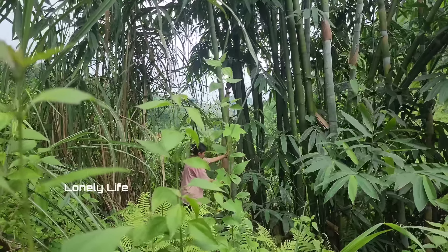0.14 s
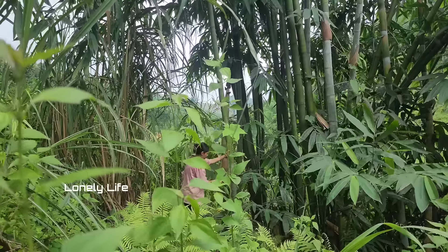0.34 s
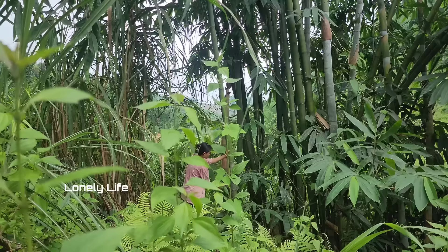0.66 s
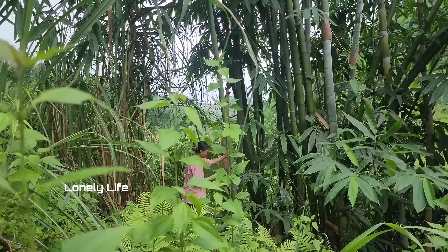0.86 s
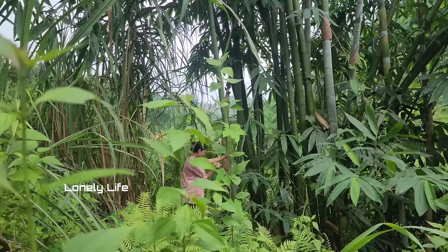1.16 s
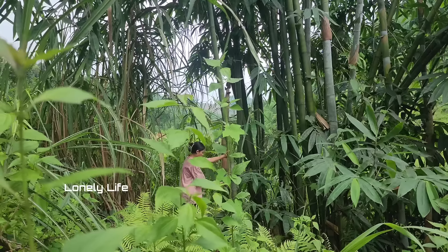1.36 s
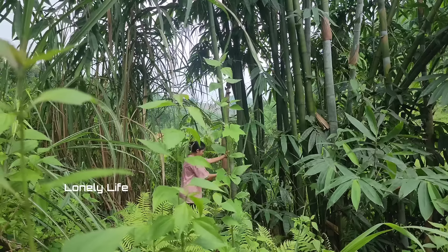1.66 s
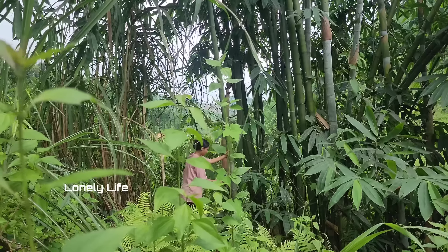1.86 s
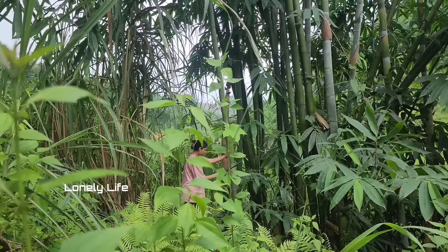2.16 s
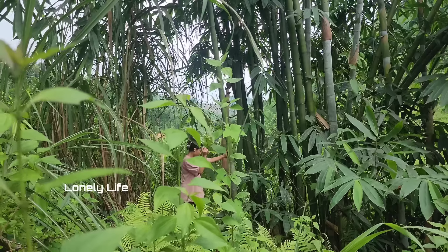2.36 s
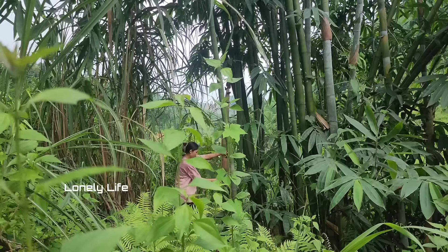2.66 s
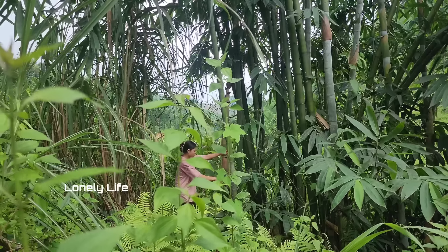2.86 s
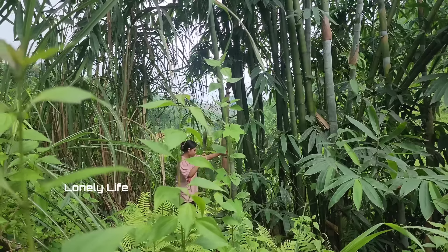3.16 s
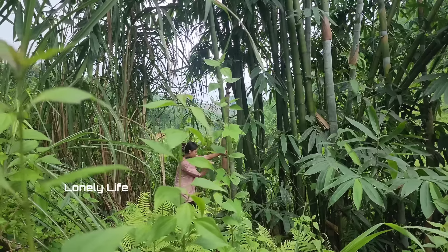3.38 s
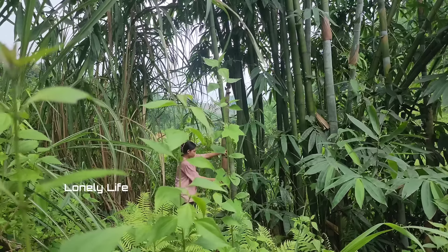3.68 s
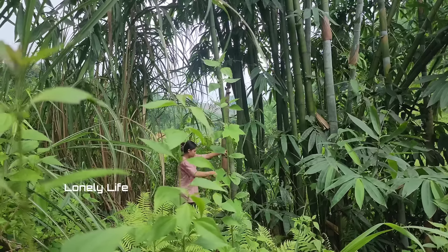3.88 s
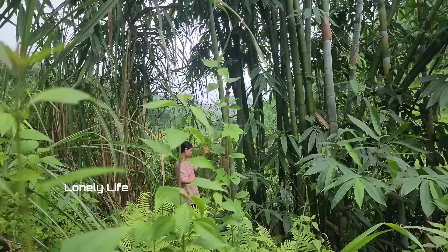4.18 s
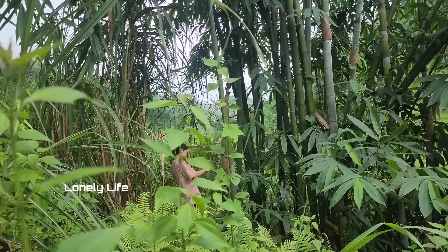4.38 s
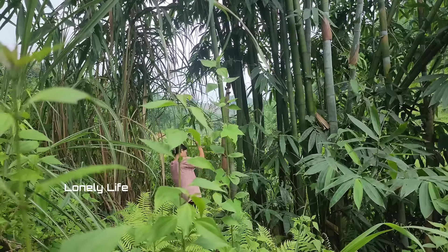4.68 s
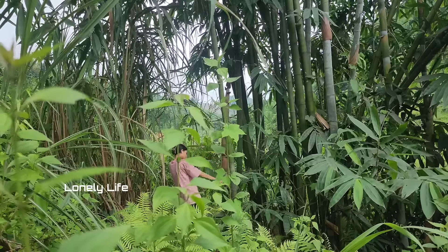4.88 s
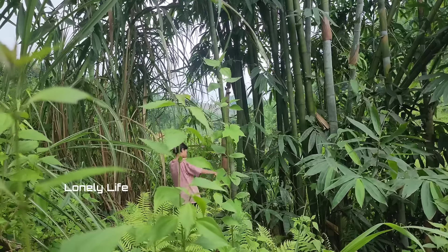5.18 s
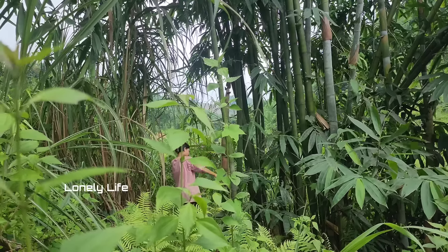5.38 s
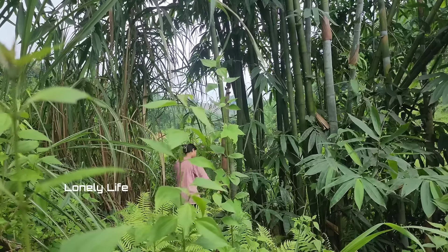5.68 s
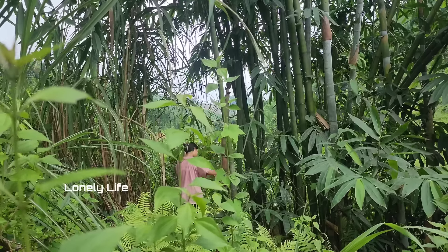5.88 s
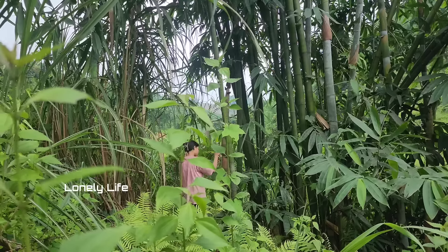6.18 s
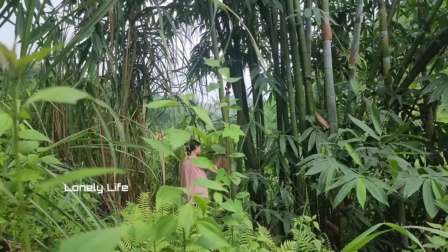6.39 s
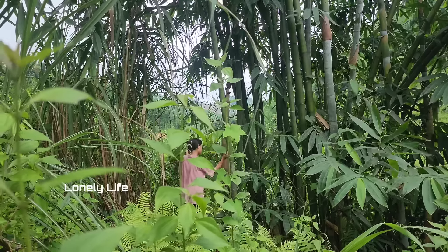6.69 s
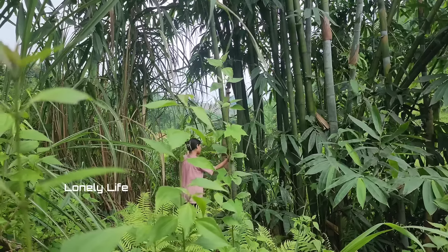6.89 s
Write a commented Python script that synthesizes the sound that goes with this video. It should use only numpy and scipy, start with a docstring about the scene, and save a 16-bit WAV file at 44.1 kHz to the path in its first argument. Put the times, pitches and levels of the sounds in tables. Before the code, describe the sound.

In a dense bamboo grove, a heavy blade chops green stems a few metres from a stereo microphone. The tail of one blow fades at 0 s, with a soft low cane knock near 0.6. Bright, hollow cracks with a low thud land at about 1.4, 2.75 and 3.6 s, each snapping fibres, ringing briefly and scattering among stems while leaves shiver. Faint scuffs and loose cane knocks come between, notably around 2.9 and 3.9. A thinner, very quick double hits at 5.0, then duller, blunter blows at 6.6 and just before 7.0, the last cut short. Steady fine insect hiss lies behind; a nearer buzz swells weakly at 4.3 and more clearly from 5.2 to 6. Faint birds whistle at 0.6, 2.1, 4.5, 5.5 and 5.9, with soft low hums after 4.3. Breeze rumble sinks away after 2 s.

```python
"""Someone chops bamboo with a heavy blade, a few metres away in a dense grove.
One blow is already dying away; four bright ones follow, the last a quick double, then two dull ones.
Each is a burst of snapping fibres, coloured by the bite, that rings through the hollow culm with a thud.
Stems scatter the blows, leaves shake and loose canes knock: shaped noise and echoes.
Behind them insects hiss and buzz, far birds whistle, low tones hum and a breeze rumbles on the microphone."""
import sys
import numpy as np
from scipy import signal
from scipy.fft import rfft, irfft
from scipy.io import wavfile
from scipy.ndimage import uniform_filter1d

SR = 44100
rng = np.random.default_rng(int(sys.argv[2]) if len(sys.argv) > 2 else 0)


def unload_audio(sound):
    """Save the sound as a 16-bit wav file, at the path given as the first command line argument."""
    columns = np.transpose(np.atleast_2d(sound))
    # keep every value between -1 and 1, then stretch to whole-number steps
    steps = np.round(np.clip(columns, -1, 1) * 32767)
    wavfile.write(sys.argv[1], SR, steps.astype(np.int16))


N = 310464
SIZE = 65536   # samples in one blow, knock or tone
AGE = np.arange(SIZE) / SR   # s since its start
HZ = np.arange(SIZE // 2 + 1) * SR / SIZE
TIME = np.arange(N) / SR
SCENE_HZ = np.arange(N // 2 + 1) * SR / N

# blows of the blade: [t/s, splitting time/s, strength/dB, sharpness of the bite f/Hz, bass/dB,
# struck spot's band f/Hz, its boost or cut/dB, echo/dB, thud/dB, note of the cut piece f/Hz, note/dB]
BLOWS = [(-.045, 0.003, -11, 8000, 6.5, 450, -2, 9, -28, 225, -36),
         (1.3918, 0.003, -0.4, 11800, -1.5, 610, -7, 0.5, -19, 1635, -22),
         (2.7500, 0.0045, 3.4, 13400, 0.5, 600, -6, -0.5, -17.5, 353, -18),
         (3.6041, .0051, .5, 15000, 2.4, 3540, -7.5, 0, -15.5, 660, -21.5),
         (5.0110, .0017, -2.5, 8100, -10, 990, 0.5, 3.5, -55, 194, -27.5),
         (5.0167, 0.0019, -0.9, 7500, -12.5, 3920, 7, -3.5, -50, 949, -17),
         (6.6100, 0.0033, 3, 1000, -1, 2730, -5.5, -0.5, -42, 297.5, -23.5),
         (6.9890, 0.0032, -1, 950, -2.5, 2500, -6.5, -5.5, -57, 707, -29)]
# resonances of the hollow culm and the gaps between them: [f/Hz, width/Hz, level/dB]
CULM_MODES = [(151, 35, 3.5), (221, 4.5, 4.5), (315, 87, 5), (380, 18, 0), (474.8, 15, 11),
              (508, 120, -6.5), (682, 100, 5.5), (814, 8.8, 0), (980, 11, -2.5), (1168, 25, 2),
              (1560, 220, -5), (1640, 26, 9.5), (1904, 18, 2), (1836, 39, -3.5), (2070, 130, 6),
              (2260, 13, 5.5), (2430, 21, -2.5), (2750, 740, -0.5), (3000, 82, 3.5), (3550, 46, -5),
              (3780, 11, 6), (3894, 64, 9), (4050, 46, 0), (4670, 64, 4.5), (5660, 170, 2),
              (7230, 390, 2.5), (9340, 1400, -7)]


def from_db(db):
    """Gain of a level."""
    return 10 ** (np.asarray(db) / 20)


def rms_one(x):
    """Scale to rms 1."""
    return x / np.sqrt(np.mean(x ** 2) + 1e-20)


def at_hz(points, hz):
    """Read a spectrum on a log-frequency axis."""
    f, value = np.transpose(points)
    return np.interp(np.log(hz + 1), np.log(f), value)


def add(out, s, sound):
    """Mix a sound in from time s on, trimmed to the scene."""
    at = int(round(s * SR))
    first, last = max(at, 0), min(at + sound.shape[-1], N)
    out[:, first:last] += sound[..., first - at:last - at]


def drift(rate, size=N):
    """Random wander of rms 1 through `rate` points per second."""
    knots = rng.standard_normal(4096)
    return rms_one(np.interp(np.arange(size) / SR * rate, np.arange(len(knots)), knots))


def humps(modes):
    """Resonances as a curve in dB."""
    return sum(db / (1 + ((HZ - hz) / (width / 2)) ** 2) for hz, width, db in modes)


def ringing(curve_db):
    """Causal (minimum-phase) response of a dB curve: its peaks ring on after a blow."""
    cepstrum = irfft(np.log(from_db(curve_db)))
    cepstrum[1:SIZE // 2] *= 2   # fold the backward half forward in time
    cepstrum[SIZE // 2 + 1:] = 0
    return np.exp(rfft(cepstrum))


def noise(curve_db):
    """Stereo noise of the given spectrum and rms 1, more alike left and right in the lows."""
    # left-right likeness of diffuse sound: [f/Hz, likeness 0-1]
    likeness = [(60, 0.7), (180, 0.88), (550, 0.43), (1650, 0), (4970, 0), (15000, 0)]
    mid, side = rfft(rng.standard_normal((2, N)))
    alike = np.clip(at_hz(likeness, SCENE_HZ), 0, 1)
    both = np.sqrt(1 + alike) * mid + np.sqrt(1 - alike) * side * [[1], [-1]]
    return rms_one(irfft(both * from_db(np.interp(SCENE_HZ, HZ, curve_db)), N))


def grove(echo_db, near_t60=0.26, far_t60=0.6, far_db=-15, close_t60=0.031, close_db=0.98, lumps_db=1.0,
          width=0.91, far_low_hz=420, far_high_hz=3800, bass_db=3, bass_hz=900, lag_samples=0.84):
    """Stereo path: straight sound, undergrowth smear, near-stem echoes and a narrower far wash."""
    mid, side = rng.standard_normal((2, SIZE)) * from_db(lumps_db * drift(2500, size=SIZE))
    side = width * irfft(rfft(side) * HZ / (HZ + 400))   # long waves reach both ears alike
    echoes = (mid + side * [[1], [-1]]) * (1 - np.exp(-AGE / 0.00064))
    near_fade = from_db(-60 * AGE / near_t60)
    smear_fade = from_db(close_db - 60 * AGE / close_t60)
    near = echoes * (near_fade + smear_fade)
    far_band = 1j * HZ / (far_low_hz + 1j * HZ) / (1 + 1j * HZ / far_high_hz)
    far = rfft(echoes * from_db(far_db - 60 * AGE / far_t60)) * far_band
    bass = 1 + (from_db(bass_db) - 1) / (1 + 1j * HZ / bass_hz)   # foliage swallows less of the lows
    scatter = (rfft(near) * bass + far) / np.sqrt(np.sum(near ** 2) / 2)
    straight = np.exp(-2j * np.pi * HZ / SR * lag_samples * np.array([[0], [1]]))   # right ear lags
    return straight * (1 + from_db(echo_db) * scatter) / np.sqrt(1 + from_db(2 * echo_db))


def evened(path, span_hz=130):
    """Many echoes together favour no band: level a path's broad colour and keep its fine ripple."""
    power = uniform_filter1d(np.abs(path.mean(0)) ** 2, max(int(span_hz * SIZE / SR), 3))
    return path * ringing(-10 * np.log10(np.maximum(power, 1e-6)))


def still_air(level_db=-56.5):
    """The grove's soft steady noise floor."""
    # spectrum of the air: [f/Hz, relative level/dB per Hz]
    air_spectrum = [(59, -8.5), (100, 0), (252, -6), (295, -4.5), (923, -5.5), (1260, -4.5), (1740, -3),
                    (3430, -1), (4000, -3), (5200, -46), (8800, -120)]
    return from_db(level_db) * noise(at_hz(air_spectrum, HZ))


def insect_chorus(level_db=-52, shimmer_db=0.56):
    """Countless insects blend into a hiss that shimmers slightly."""
    # spectrum of the chorus: [f/Hz, relative level/dB per Hz]
    chorus_spectrum = [(2350, -53), (4000, -5.5), (4230, -1.5), (4640, -2.5), (5400, 2.5), (5910, -4.5),
                       (6440, -4.5), (6850, -9), (7500, -5), (8310, -7.5), (8940, -11.5), (10200, -12.5),
                       (14600, -19.5), (15500, -24)]
    return from_db(level_db + shimmer_db * drift(25)) * noise(at_hz(chorus_spectrum, HZ))


def breeze(start_db=-56, sag_db_per_s=2.5, ends_s=2.05, extra_fall_db_per_s=7, calm_db=-76, gust_db=4):
    """A lumpy low rumble of wind on the microphone sinks slowly, then dies down to a calm."""
    # spectrum of the rumble: [f/Hz, relative level/dB per Hz]
    rumble_spectrum = [(15, -2.5), (30, -3), (60, -3), (100, -13.5), (200, -46), (600, -70)]
    sinking_db = start_db - sag_db_per_s * TIME
    sinking_db = sinking_db - extra_fall_db_per_s * np.maximum(TIME - ends_s, 0)
    wind_db = np.maximum(sinking_db, calm_db)
    gusts = rms_one(noise(at_hz(rumble_spectrum, HZ)) * from_db(gust_db * drift(21)))
    return from_db(wind_db) * gusts


def buzzing(rise_db_per_s=102, sag_db_per_s=7.5, fall_db_per_s=61):
    """The nearer insect: narrow noisy partials in bursts that swell, sag and stop."""
    # partials of the buzz: [f/Hz, width/Hz, relative level/dB]
    buzz_partials = [(4260, 120, 4), (5360, 150, -9), (6330, 110, 7), (7320, 190, 2.5), (9600, 400, -9)]
    # bursts: [t/s at full voice, hold/s, level/dB]
    bursts = [(4.25, 0.33, -63.5), (5.2, 0.75, -54.5)]
    level = 0
    for s, hold, db in bursts:
        age = TIME - s
        swell_db = rise_db_per_s * np.minimum(age, 0)
        sag_db = sag_db_per_s * np.clip(age, 0, hold)
        stop_db = fall_db_per_s * np.maximum(age - hold, 0)
        level = level + from_db(db + swell_db - sag_db - stop_db)
    spectrum = sum(from_db(db) / (1 + ((HZ - hz) / (width / 2)) ** 2) for hz, width, db in buzz_partials)
    return level * noise(20 * np.log10(spectrum))


def far_tones(waver=0.029, waver_hz=18, flutter_db=3, echo_db=1):
    """Bird whistles and low hums: unsteady gliding sines, blurred by the stems on their way."""
    # far bird whistles: [t/s, length/s, start f/Hz, end f/Hz, level/dB]
    whistles = [(.62, 0.22, 1450, 1514, -60), (2.12, 0.27, 1310, 1212, -63), (4.46, .09, 1150, 897, -58.5),
                (5.45, .34, 1325, 1274, -65), (5.9, 0.11, 1180, 1060, -56.5)]
    # soft low hums: [t/s, length/s, f/Hz, level/dB]
    hums = [(4.295, .15, 138, -54), (4.53, .08, 140, -50), (4.53, .12, 228, -55), (5.95, .34, 370, -65),
            (5.93, .2, 215, -58), (6.33, .07, 202, -60)]
    steady = [(s, length, hz, hz, db) for s, length, hz, db in hums]
    out, path = np.zeros((2, N)), evened(grove(echo_db))
    for s, length, start_hz, end_hz, db in whistles + steady:
        part = np.clip(AGE / length, 0, 1)
        glide = start_hz + (end_hz - start_hz) * part
        hz = glide + (waver_hz + waver * start_hz) * drift(107.4, size=SIZE)
        tone = np.sin(2 * np.pi * np.cumsum(hz) / SR) * np.sqrt(4 * part * (1 - part))
        fluttering = tone * from_db(db + flutter_db * drift(58, size=SIZE))
        add(out, s, irfft(rfft(fluttering) * path))
    return out


def leaves(rise_s=0.0067, settle_s=0.14, flutter_db=1.5, shake_db=-29.98, follows_thud=0.37):
    """The jolt runs up the stem and its leaves shiver, the more the heavier the thud, then settle."""
    # spectrum of the rustle: [f/Hz, relative level/dB per Hz]
    rustle_spectrum = [(200, -8), (1000, 0), (3000, 0.5), (6000, -7), (10000, -6.5), (15000, -10)]
    shake = 0
    for s, *_, thud_db, _, _ in BLOWS:
        age = np.maximum(TIME - s, 0)
        jolt = from_db(shake_db + follows_thud * thud_db)
        shake = shake + jolt * (1 - np.exp(-age / rise_s)) * np.exp(-age / settle_s)
    return shake * rms_one(noise(at_hz(rustle_spectrum, HZ)) * from_db(flutter_db * drift(300)))


def crack(length, count=5, rise=.3):
    """Fibres snap in a quick run as the blade sinks in: spectrum of an even, bright burst of energy 1."""
    age = AGE[:SIZE // 16]
    snaps = rng.standard_normal(len(age)) * (age / length) ** rise * np.exp(-(age / length) ** 2)
    for _ in range(count):   # flatten the spectrum, then shorten the burst again
        flat = irfft(np.exp(1j * np.angle(rfft(snaps))))
        snaps = flat * np.exp(-(age / (1.48 * length)) ** 6)
    return rfft(snaps / np.sqrt(np.sum(snaps ** 2)), SIZE)


def knocks(echo_db=-3, depth_db=30):
    """Loose canes touch: the same wood, stirred softly in a narrower range."""
    # light knocks and scuffs: [t/s, contact/s, energy/dB, centre f/Hz, spread/octaves]
    touches = [(0.556, .008, -9, 168, 0.63), (1.729, 0.014, -16.5, 1460, 1.9),
               (1.882, 0.0099, -17.5, 2000, 1.9), (2.4141, 0.0033, -6.5, 596, 1.36),
               (2.5968, 0.0048, -10.5, 520, 1.2), (2.924, 0.0064, -3, 1140, 0.63),
               (2.974, 0.017, -4, 820, 1.48), (3.2269, .012, -11, 960, 1.8), (3.91, 0.0068, -12, 2960, 1.9),
               (3.927, 0.0055, 2, 925, 0.13), (5.973, 0.053, -8.5, 780, 1.3)]
    out, body_db = np.zeros((2, N)), humps(CULM_MODES)
    for s, length, db, hz, octaves in touches:
        nearness = np.exp(-(np.log2((HZ + 1) / hz) / (2 * octaves)) ** 2)
        wood = ringing(db + depth_db * (nearness - 1) + body_db)
        add(out, s, irfft(wood * evened(crack(length) * grove(echo_db))))
    return out


def bite(hz, strength_db, sharp_hz, bass_db, spot_hz, spot_db,
         slope_db_per_octave=10.5, bass_hz=410, spot_octaves=.55):
    """Drive in dB: a blunt bite loses treble, the stem's hold shifts bass, the struck spot one band."""
    dull_db = slope_db_per_octave * np.log2(1 + (hz / sharp_hz) ** 4) / 4   # slope above sharp_hz
    near_spot = np.exp(-(np.log2((hz + 1) / spot_hz) / spot_octaves) ** 2)
    return strength_db - dull_db + bass_db / (1 + (hz / bass_hz) ** 2) + spot_db * near_spot


def splinters(uneven_db=3, spacing_hz=190):
    """Every cut frees slivers of other lengths, each with a short ring of its own: a dB curve."""
    places = np.arange(400) * spacing_hz
    return uneven_db * np.interp(HZ, places, rng.standard_normal(len(places))) * HZ / (HZ + 1200)


def singing(notes, length, waver_db=3, waver_hz=22):
    """Damped notes build up while the blade sinks in; the wedged blade makes them waver."""
    rings = 0
    for hz, t60, db in notes:
        wavering_hz = hz + waver_hz * np.sqrt(hz / 1000) * drift(148, size=SIZE)
        turns = np.cumsum(wavering_hz) / SR
        level = from_db(db - 60 * AGE / t60 + waver_db * drift(123, size=SIZE))
        rings = rings + level * np.sin(2 * np.pi * turns)
    return rings * (1 - np.exp(-AGE / length))


def thud(hz=113, rise_s=0.016, swell=5.3, lag_s=0.00043):
    """The whole stem takes up the blow and swings for a few cycles."""
    age = np.maximum(AGE - lag_s, 0)
    swing = (age / rise_s * np.exp(1 - age / rise_s)) ** swell * np.exp(-(age / 0.032) ** 4)
    return np.sin(2 * np.pi * hz * age) * swing


def chops(low_cut_hz=74, note_echo_db=-9, note_db=-2, piece_t60_s=0.17):
    """Each crack is coloured by the bite, rings through the culm and scatters in the grove."""
    # a clean cut through green bamboo: [f/Hz, energy/dB]
    clean_cut = [(100, 21.5), (300, 16.5), (680, 17), (1050, 16.5), (2100, 15), (4000, 13.5), (8000, 11),
                 (14000, 4.5)]
    # long notes of the standing stem, stirred by every blow: [f/Hz, t60/s, level/dB before bite and note_db]
    stem_notes = [(217.3, 0.29, -31.5), (303.7, 0.21, -28.5), (384.2, 0.23, -32.5), (687, 0.14, -25.5),
                  (954.5, 0.12, -28), (1170, 0.12, -26), (1800, 0.13, -29), (2294, 0.31, -32.5)]
    out = np.zeros((2, N))
    low_cut_db = 10 * np.log10(1 + (low_cut_hz / (HZ + 10)) ** 8)
    body_db = at_hz(clean_cut, HZ) + humps(CULM_MODES) - low_cut_db
    for s, length, *stroke, echo_db, thud_db, piece_hz, piece_db in BLOWS:
        wood = ringing(body_db + splinters() + bite(HZ, *stroke))
        split = irfft(wood * evened(crack(length) * grove(echo_db)))
        notes = [(hz, t60, db + bite(hz, *stroke)) for hz, t60, db in stem_notes]
        notes.append((piece_hz, piece_t60_s, piece_db))
        tone = from_db(note_db) * irfft(rfft(singing(notes, length)) * grove(note_echo_db))
        add(out, s, split + tone + from_db(thud_db) * thud())
    return out


def scene():
    """Everything that sounds in the grove."""
    background = still_air() + insect_chorus() + breeze()
    return background + buzzing() + far_tones() + leaves() + knocks() + chops()


def record(dry, ceiling=.8, cutoff_hz=15700):
    """Each microphone adds its colour, the highest peaks are rounded and the top is cut."""
    # the two microphones differ in colour: [f/Hz, left minus right/dB]
    mic_balance = [(60, 0), (200, 1.6), (400, 4), (1300, 1.5), (2400, 1.7), (4500, -2), (8000, -2),
                   (13000, 1.5)]
    balance_db = at_hz(mic_balance, SCENE_HZ)
    heard = irfft(rfft(dry) * from_db(balance_db * np.array([[.5], [-.5]])), N)
    rounded = heard / (1 + (heard / ceiling) ** 4) ** (1 / 4)
    top_cut = signal.ellip(10, .1, 80, cutoff_hz, fs=SR, output="sos")
    return signal.sosfilt(top_cut, rounded)


dry = scene()
out = record(dry)
unload_audio(out)
```